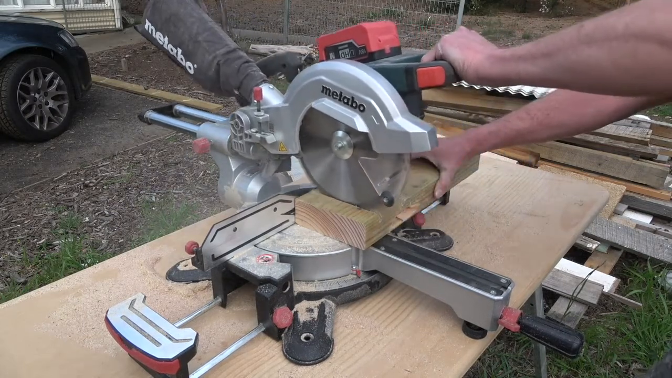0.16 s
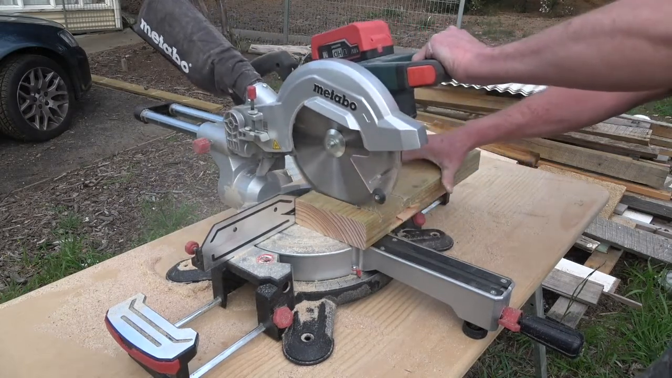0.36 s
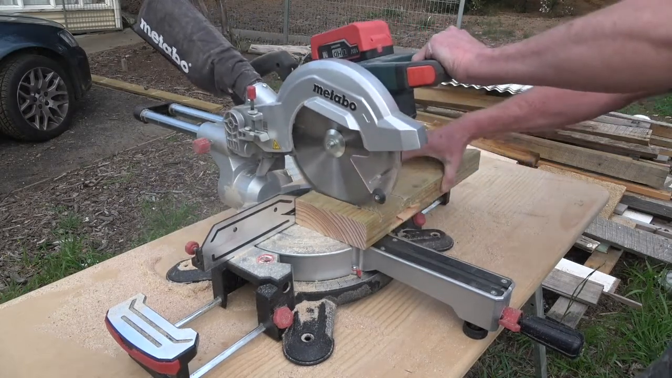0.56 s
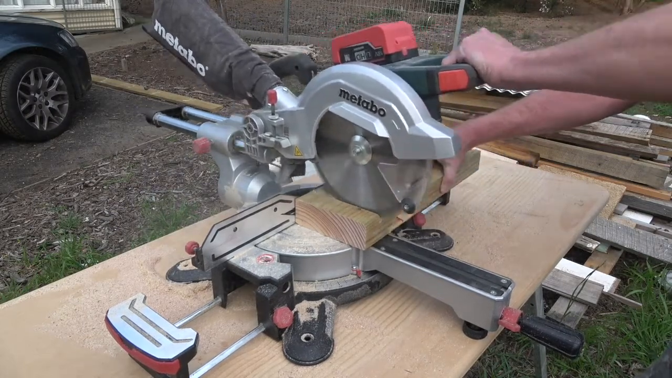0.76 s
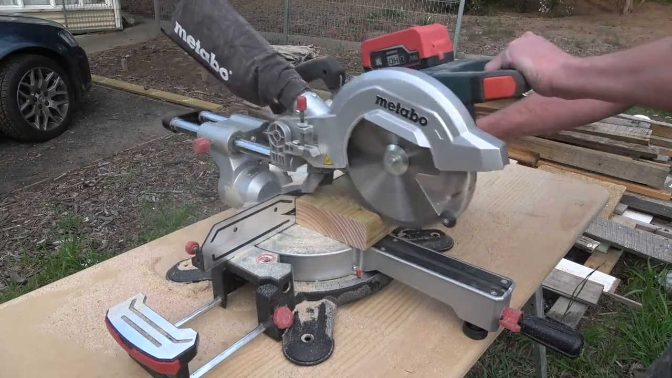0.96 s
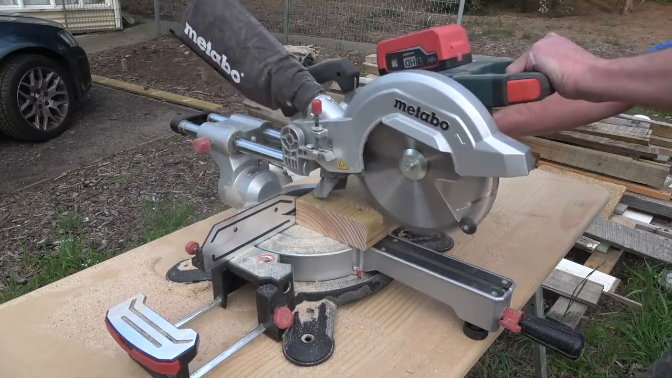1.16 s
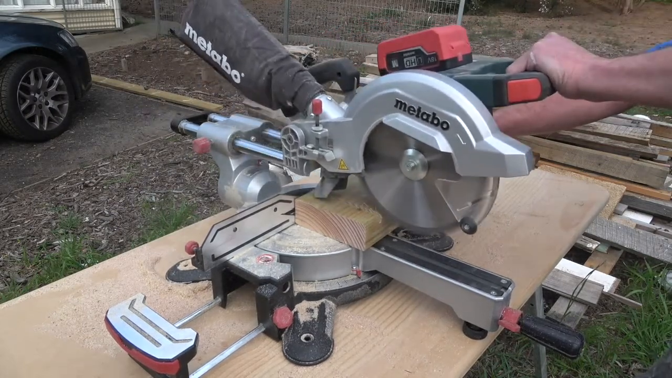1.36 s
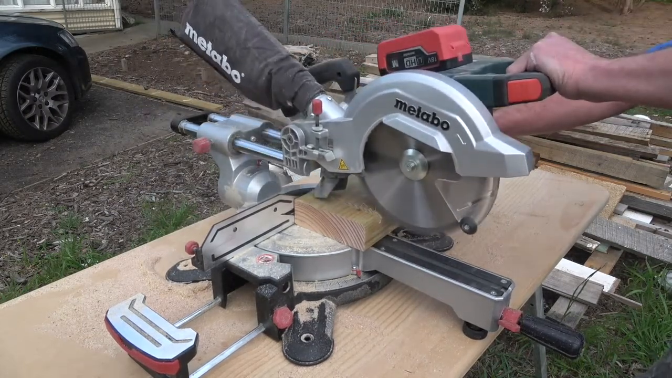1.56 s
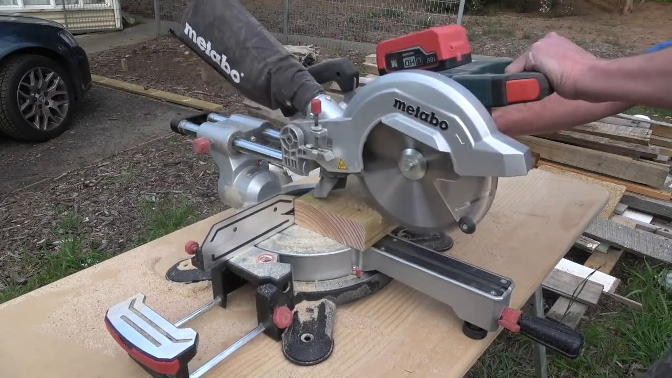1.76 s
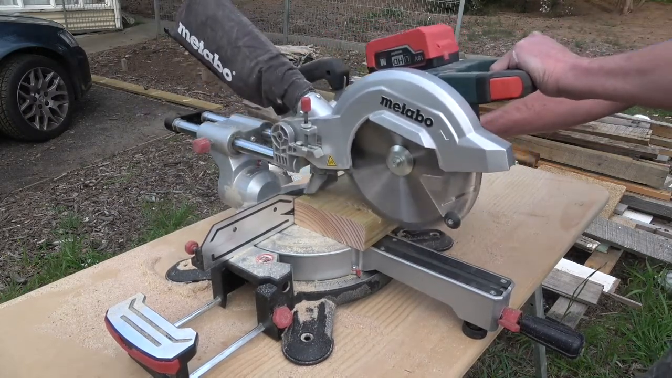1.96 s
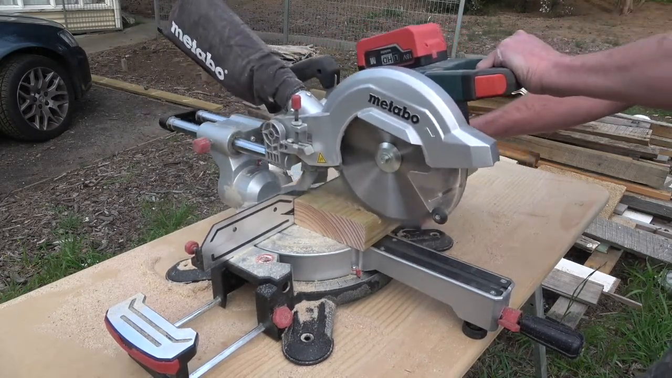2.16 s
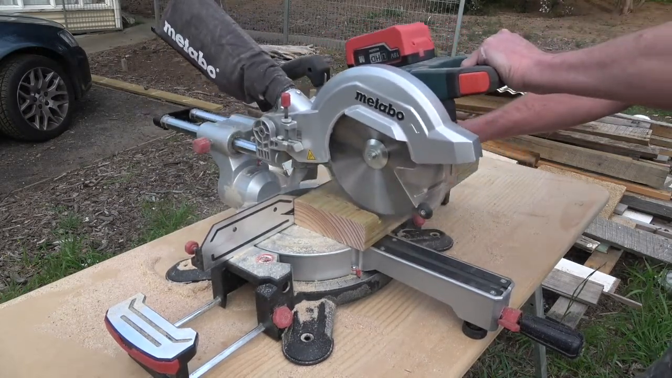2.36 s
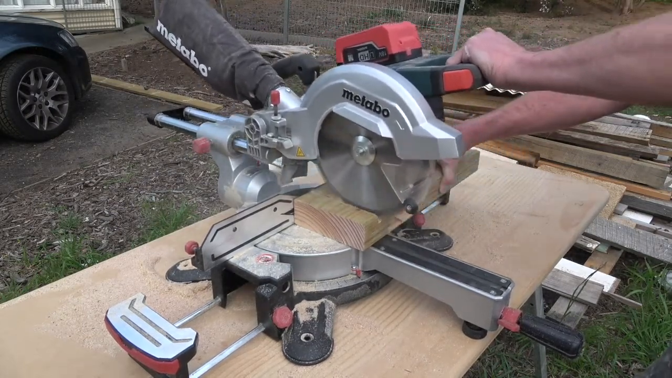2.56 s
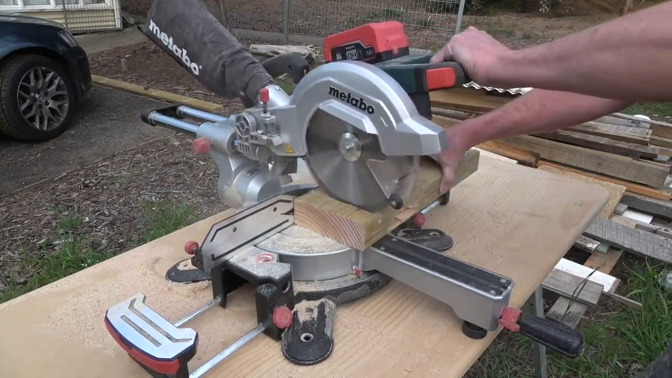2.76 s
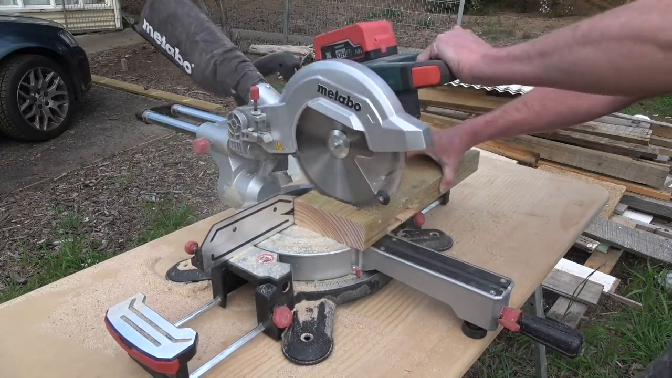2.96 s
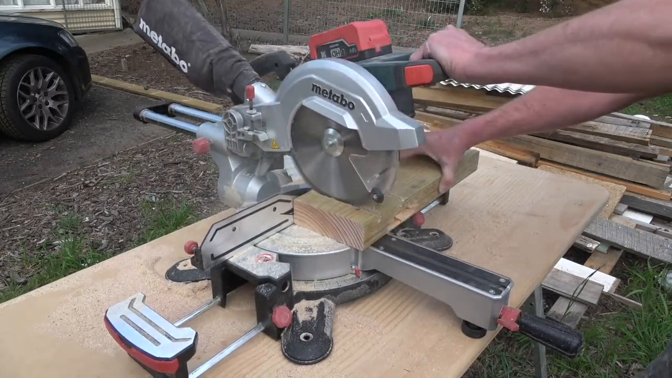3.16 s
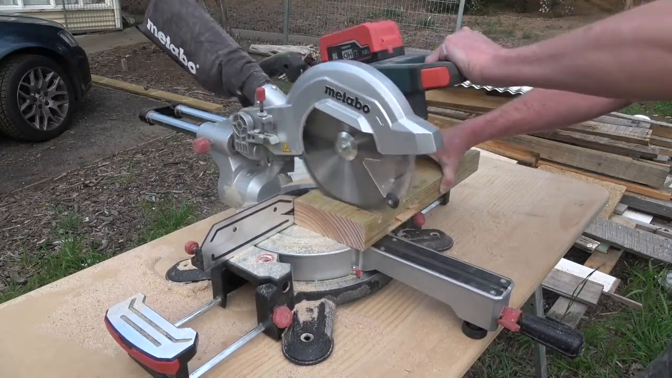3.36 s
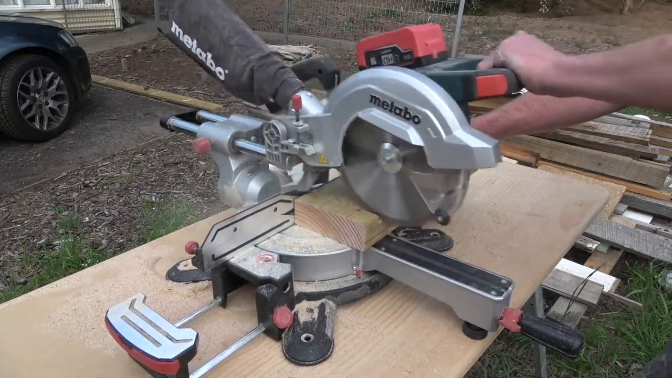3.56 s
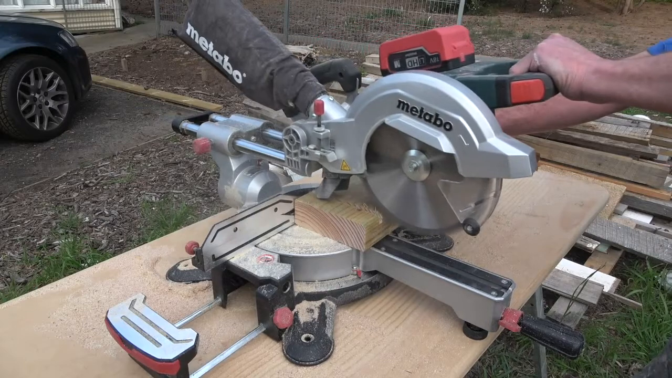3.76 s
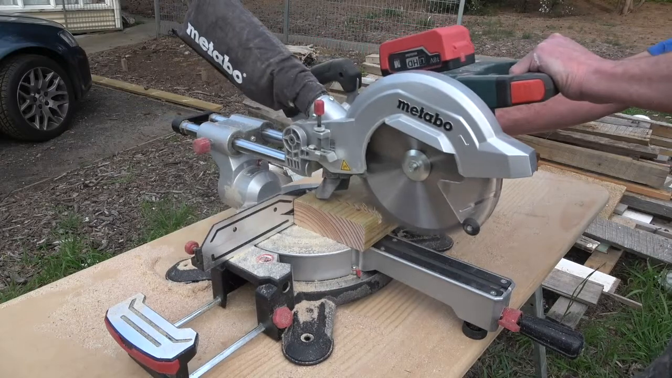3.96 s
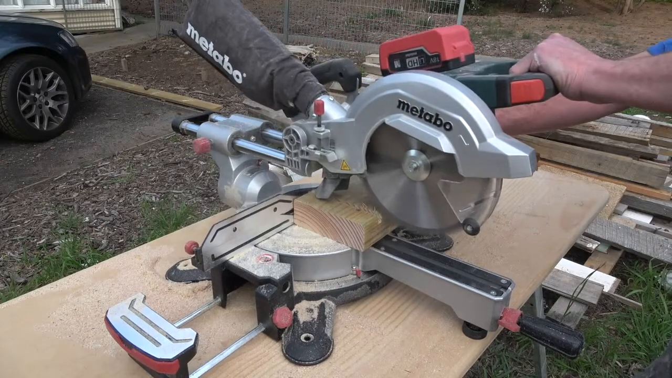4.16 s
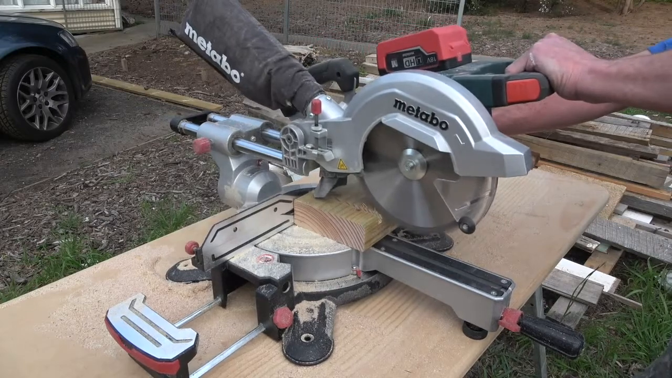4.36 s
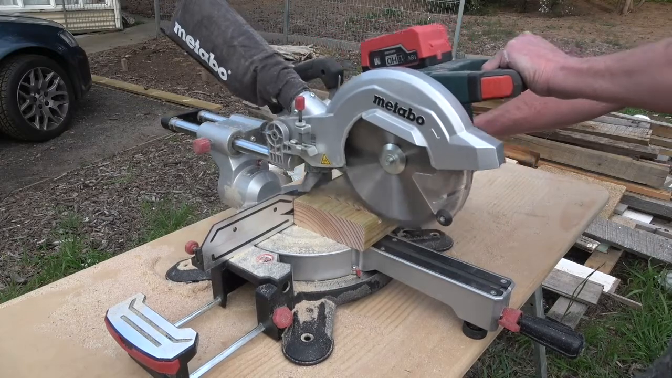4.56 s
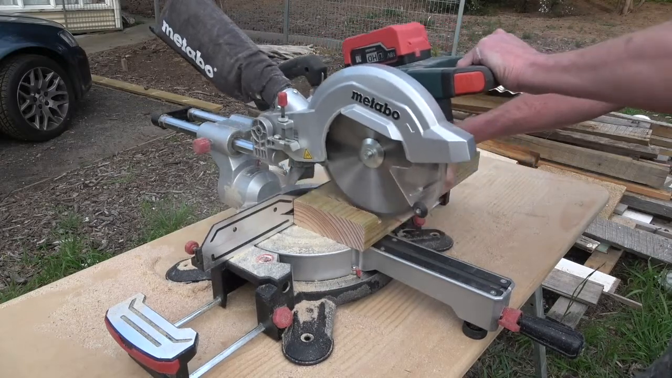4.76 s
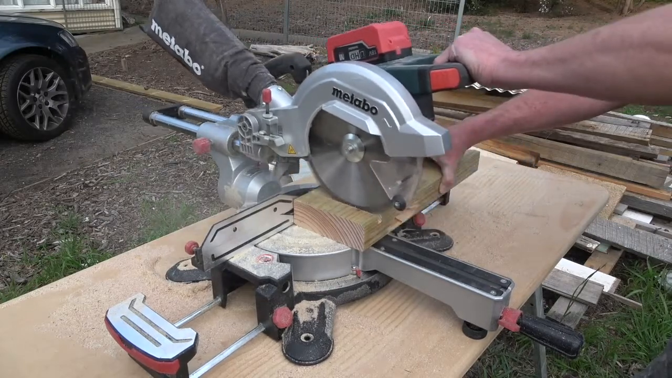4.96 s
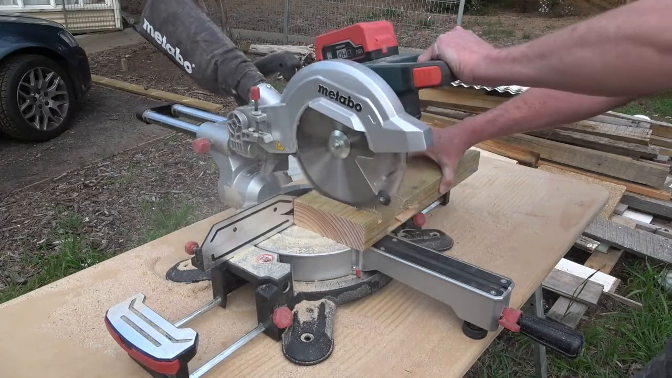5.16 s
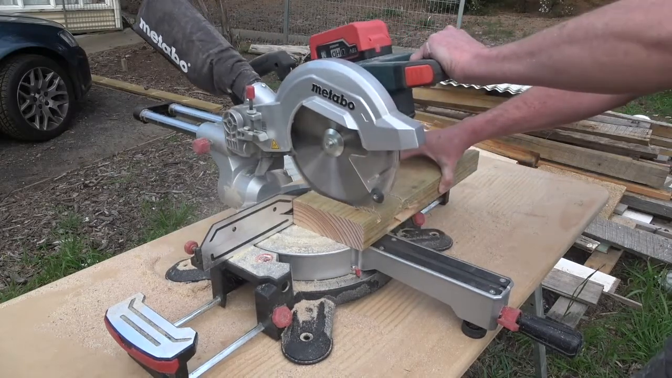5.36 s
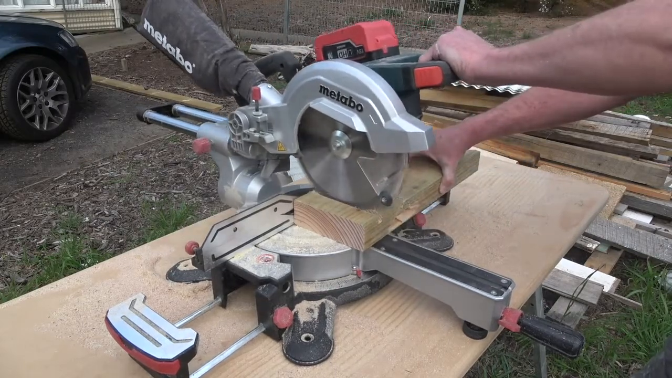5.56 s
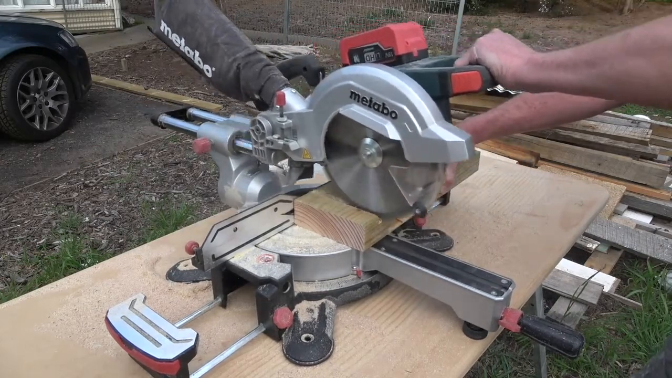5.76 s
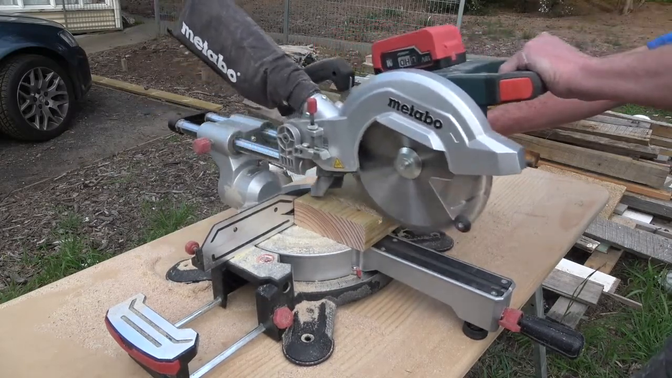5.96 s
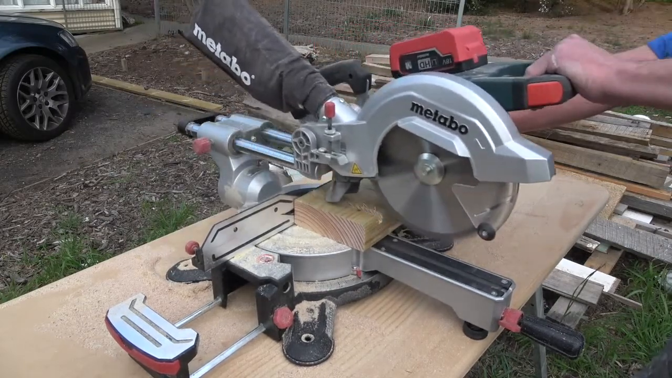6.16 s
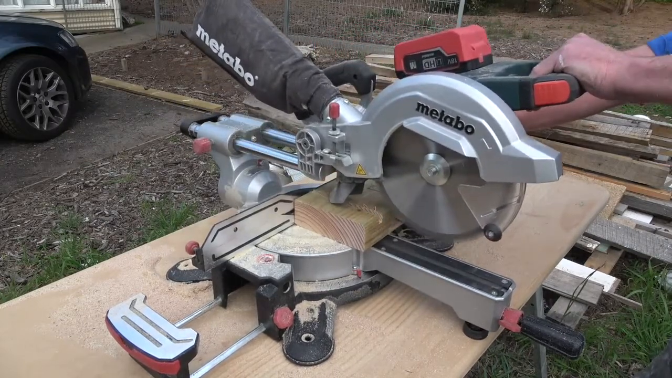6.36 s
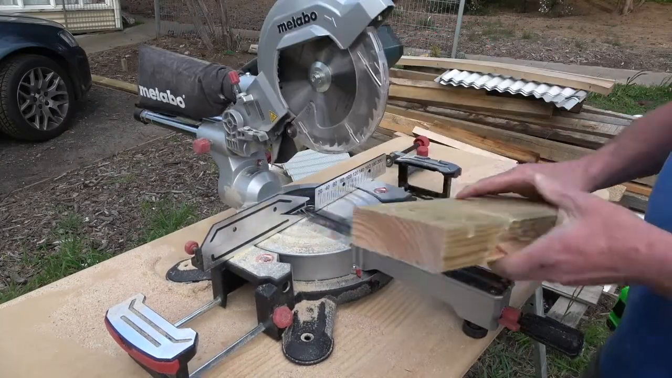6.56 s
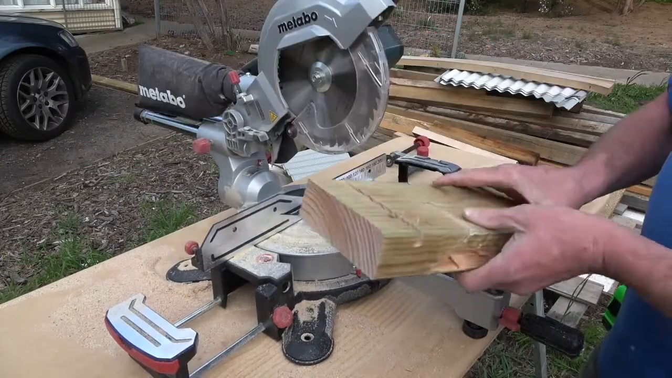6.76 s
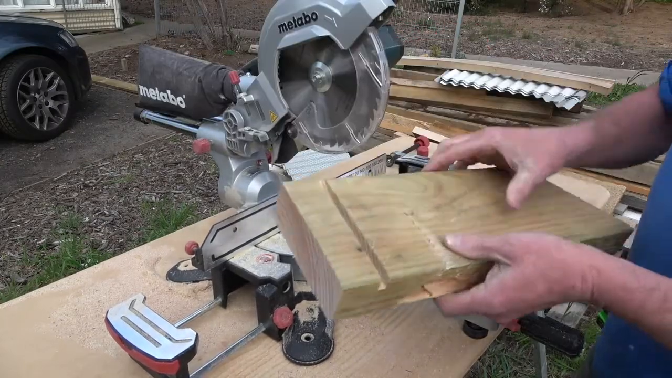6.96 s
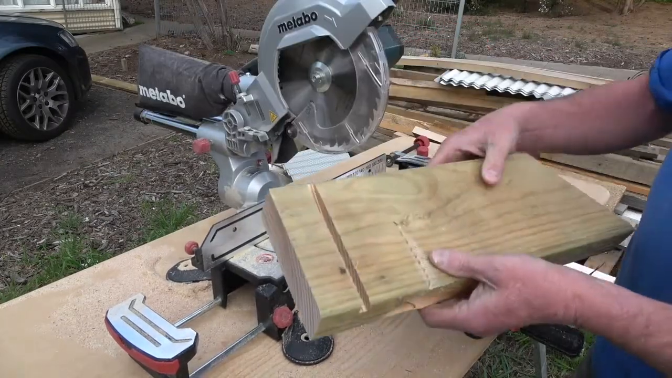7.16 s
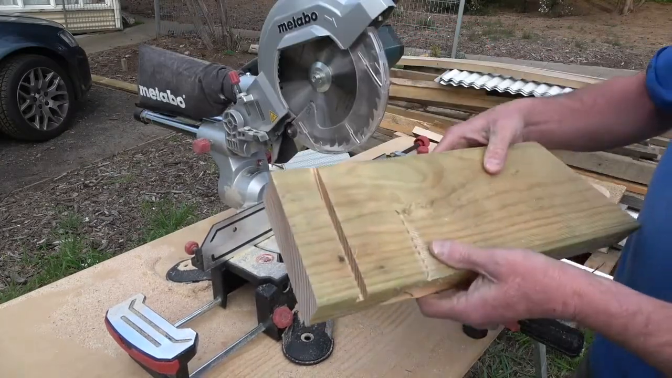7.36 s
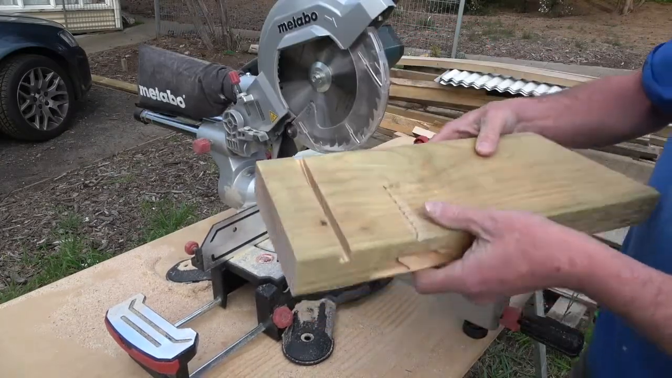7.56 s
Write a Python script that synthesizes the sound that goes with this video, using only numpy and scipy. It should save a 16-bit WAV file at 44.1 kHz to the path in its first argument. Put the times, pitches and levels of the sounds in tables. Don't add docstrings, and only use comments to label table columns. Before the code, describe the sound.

A bright, hissing electric saw fills an open yard, with gear whine, fan roar and metallic blade ringing. Three grooving cuts alternate with free-running whine, each cut pulling the pitch down amid gritty chip noise and small tooth nicks. After the last, the brake drags the tone rapidly lower. A hard cut reveals faint skin rubbing on wood, hollow palm knocks and wind thumping the single microphone.

```python
import sys
import numpy as np
from scipy import signal
from scipy.fft import rfft, irfft, next_fast_len
from scipy.io import wavfile
from scipy.ndimage import uniform_filter1d, map_coordinates

SR = 44100
rng = np.random.default_rng(int(sys.argv[2]) if len(sys.argv) > 2 else 0)


def magnitude_from_level(level_db):
    exponent = np.asarray(level_db, float) / 20
    return 10 ** exponent


def transcribe(u):
    v = np.clip(np.atleast_2d(u).T, -1, 1)
    q = np.round(v * 32767).astype(np.int16)
    wavfile.write(sys.argv[1], SR, q)


N = 335595
T_S = np.arange(N) / SR
SCENE_CHANGE_S = 6.505
TOP_HZ = 15730

# (time [s], peak [dB], rise [dB/s], fall [dB/s])
GUSTS = [(0, -47, 100, 170), (.3, -59, 10, 10), (.63, -47, 300, 25), (1.0, -43, 25, 60),
         (1.3, -41, 20, 120), (2.8, -44, 200, 150), (3.22, -54, 12, 80), (3.98, -41.5, 43, 45),
         (4.79, -41.5, 35, 50), (5.25, -49, 60, 60), (5.8, -56, 20, 50), (6.55, -32, 500, 50),
         (6.93, -41.5, 33, 50), (7.29, -33.5, 45, 100), (7.48, -32.5, 110, 51)]
# (frequency [Hz], level [dB/Hz])
GUST_SPECTRUM = [(7.1, -35), (12, 6), (27, -1), (36, -1), (48, -8), (84, -19.5), (162, -44.5), (200, -54.5),
                 (260, -89), (440, -120)]
CALM_DB, YARD_DB = -68, -63.5
# (frequency [Hz], level [dB/Hz])
YARD_SPECTRUM = [(59, -29), (100, -8), (172, -14.5), (432, -9.5), (1590, -16), (2570, -25), (4150, -25),
                 (7270, -45), (12000, -47), (15600, -72), (22000, -120)]

# (time [s], peak [dB], rise [dB/s], fall [dB/s])
SHUFFLES = [
    (6.533, -51, 1200, 200),
    (7.022, -57, 150, 8.5),
    (7.61, -57.5, 75, 50),
]
# (time [s], length [s], level [dB])
STROKES = [(6.5, .045, -69), (6.563, .095, -66.5), (6.65, .05, -78), (6.698, 0.064, -73), (6.76, .04, -80),
           (6.797, 0.077, -66.5), (6.87, .1, -79), (6.92, .014, -75), (6.968, .11, -68.5), (7.08, .2, -77),
           (7.27, .16, -82), (7.428, 0.096, -71), (7.548, 0.016, -72)]
# (frequency [Hz], level [dB/Hz])
SKIN_SPECTRUM = [(1500, -4), (2500, -3), (3900, -4), (5400, -4.5), (6400, -7), (8000, -15), (12500, -14),
                 (15500, -24)]
# (time [s], length [s], start [Hz], end [Hz], width [Hz], level [dB])
HOLLOWS = [(6.51, 0.083, 300, 200, 150, -57), (6.515, 0.04, 800, 550, 500, -52),
           (6.8, 0.075, 3830, 3810, 200, -65), (7.0, 0.057, 1540, 1500, 90.4, -59),
           (7.02, 0.13, 920, 724, 240, -58), (7.1, .16, 476, 463, 70.4, -61.5),
           (7.08, .14, 3850, 3870, 150, -72), (6.59, .05, 6300, 6250, 300, -73),
           (6.8, .075, 5350, 5300, 400, -73), (6.8, .075, 3350, 3300, 200, -73),
           (7.22, .3, 3950, 4100, 160, -74), (7.08, .08, 5400, 5350, 300, -76),
           (7.44, .07, 5500, 5500, 250, -73), (6.55, .2, 3200, 3150, 200, -73)]

# (time [s], drag [Hz])
DRAG = [(0.0, 35.1), (0.2, 32.5), (0.48, 1.7), (0.92, -1.1), (1.76, 0.5), (1.82, 19.1), (2.22, 59.0),
        (2.7, 77.1), (3.0, 66.7), (3.05, 17.2), (3.21, -0.9), (4.3, 0.5), (4.56, 32.7), (4.73, 38.7),
        (5.16, 26.4), (5.33, -2.1), (5.96, 1.0)]
FREE_HZ, START_HZ, INERTIA_S = 364.5, 321.4, 0.22
BRAKE_S, BRAKE_GRIP_S, BRAKE_HZ_PER_S, BRAKE_HZ_PER_S2 = 5.96, 0.039, 328, 114
TORQUE_HZ = 13
# (time [s], nearness [dB])
NEAR = [(0, -28), (.45, -27.5), (1.1, -25.5), (1.2, -28), (1.75, -28), (2.32, -28.5), (2.42, -28),
        (3.05, -29.5), (3.3, -31), (3.55, -30), (4.35, -29.5), (4.9, -31), (5.2, -32.5), (5.42, -33.5),
        (5.6, -31.5), (5.95, -29), (6.15, -26.5), (6.5, -27.5)]
ROAR_DB_PER_HZ, AIR_DB_PER_HZ, AIR_DB, BURIED_DB = 0.06, 0.078, -3, -2.2
# (start [s], end [s], bite at start [dB], bite at end [dB])
CUTS = [(-.1, .40, -34.5, -35.5), (.40, 0.926, -37, -40), (.93, 1.2, -44, -48.5),
        (1.77, 2.338, -37.5, -35.5), (2.34, 3.079, -38.5, -36), (3.08, 3.475, -39, -41),
        (3.47, 3.622, -44, -44), (3.62, 3.671, -40, -37), (3.666, 3.78, -46.5, -51),
        (4.365, 4.698, -38.5, -37.5), (4.7, 5.27, -40.5, -38), (5.27, 5.46, -40.5, -46.5),
        (5.46, 5.847, -40.5, -39.5), (5.85, 5.952, -42.5, -43.5), (5.98, 6.14, -43.5, -48.5),
        (6.17, 6.4, -47, -51.5)]
IDLE_BITE_DB, ENTER_S = -53.5, 0.016

STRONG_ORDERS = (7, 8, 16, 25)
BLADE_RATIO = 8 / 43
TEETH_PER_TURN = 40 * BLADE_RATIO
TONE_DB, TONE_FOLLOWS = -30, 0.45
# (order [x shaft], centre [Hz], width [Hz], idling [dB], pulling [dB])
FLARES = [(7, 2545, 130, -5.5, -4), (7, 2380, 200, -20, -6), (7, 1900, 900, -25, -17),
          (8, 2380, 300, -19.5, 0), (8, 2660, 260, -18.5, 0), (8, 2860, 160, -12, -5),
          (8, 2050, 250, -20, -7), (16, 5560, 260, -28, 1), (16, 5260, 260, -28, -3),
          (16, 4880, 250, -28, -8), (16, 5750, 120, -27.5, -11), (16, 3900, 900, -28, -9),
          (25, 9110, 110, -8, -13), (25, 8900, 260, -15, -15), (25, 7760, 200, -20.5, -9),
          (25, 6500, 2600, -30, -21), (25, 6290, 300, -20, -13.5), (25, 5540, 260, -21, -11),
          (25, 4900, 300, -20, -14)]
# (time [s], half length [s], change [dB], order [x shaft, 0 = all])
BEAMS = [(6.2, .025, -7, 8), (6.36, .05, -6, 8), (6.22, .04, -7, 25), (6.1, .02, -6, 25),
         (6.12, .025, -7, 16), (6.25, .03, -6, 16), (2.18, .1, 2, 16), (.55, .1, 1.5, 16),
         (3.07, .08, -2, 8), (5.8, .12, -3, 8), (.07, .1, -3.5, 0), (2.85, .25, -1.5, 8), (2.4, .12, 6, 7),
         (4.05, .3, -2, 7), (1.87, .08, -2, 7), (5.15, .2, -1.5, 8), (.35, .12, 2, 0), (2.36, .09, -5, 0),
         (3.2, .1, -2, 0), (3.56, .06, -3, 0), (4.74, .06, -2, 0), (5.64, .2, -10, 0), (.74, .12, -5, 7),
         (1.02, .1, 2, 7), (1.22, .025, -8, 7), (4.55, .08, -4, 7), (5.68, .15, -4, 7), (.72, .14, -5, 8),
         (3.37, .08, -3, 8), (4.77, .06, -10, 16), (4.52, .07, -4, 16), (1.87, .08, -5, 16),
         (2.17, .08, -3, 16), (2.1, .15, 4, 25), (3.07, .07, 3, 25), (5.15, .15, 4, 25)]
BRAKED_DB = (-6, -3, -3, 2)
# (order [x shaft], level [dB])
ORDERS_WEAK = [(3, 3), (6, 1), (9, 2.5), (15, 7), (17, 1.5), (20, 1.5), (22, 5.5), (24, 3), (19, 3),
               (37, 5), (40, 1), (41, 5.5), (42, 7.5)]
# (order [x shaft], level [dB])
ORDERS_BRAKE = [(3, -3), (4, 4), (5, 7), (6, 4), (9, 1), (12, 3), (15, 3), (17, 2), (20, 1), (21, 3),
                (23, 3), (24, 9), (26, 6), (28, 4), (33, 6), (36, 0), (40, 7), (41, 12), (42, 18), (43, 6),
                (50, 9), (51, 14)]
# (centre [Hz], width [Hz], level [dB])
CASING = [(928, 190, -6), (2170, 430, -3), (2680, 390, 0), (3930, 380, -1.5), (5380, 160, 1),
          (6180, 500, -11.5), (7230, 130, -13.5), (7750, 280, -10), (12010, 420, -12), (12930, 240, -8)]
# (frequency [Hz], level [dB/Hz])
AIR_SPECTRUM = [(100, -32.5), (190, -25.5), (260, -24), (400, -19.5), (540, -11), (690, -10), (790, -7),
                (930, -6), (1080, -1.5), (1230, -7), (1380, -16), (1550, -18), (2500, -18)]
# (frequency [Hz], level [dB/Hz])
ROAR_SPECTRUM = [(900, -34), (1500, -8), (2000, -3.5), (2450, -4), (2830, -8), (3100, -2.5), (4700, -1),
                 (5600, -2), (6600, -14.5), (8600, -19), (9400, -17.5), (10300, -25), (12400, -15.5),
                 (13500, -25), (15700, -32.5)]
# (frequency [Hz], level [dB/Hz])
RASP_SPECTRUM = [(4900, -25), (5400, 3), (5800, -21), (10500, -20), (11700, -1), (12900, 2), (13500, -13.5),
                 (15700, -28.5)]

# (centre [Hz], width [Hz], level [dB])
BLADE_MODES = [(2562, 33, -5.5), (3050, 40, -10), (3260, 49, -11.5), (3760, 37, -7.5), (4400, 45, -12),
               (5020, 50, -4.5), (5253, 77, -4.5), (6100, 44, -7.5), (6490, 25, -5.5), (6520, 36, -12.5),
               (6720, 64, -10.5), (7110, 30, -8), (7740, 32, -11.5), (8100, 60, -7.5), (8950, 50, -11),
               (9490, 52, -10), (10240, 45, -20), (10500, 50, -11.5), (11700, 61, -11), (12200, 50, -15),
               (12940, 60, -9), (13200, 50, -14), (13800, 40, -15), (14300, 50, -12), (15250, 60, -14)]
PLATE_HZ, PLATE_WIDTH_HZ, PLATE_SHIFT = 2590, 130, 1.012
# (time [s], peak [dB])
NICKS = [(0.098, -15), (2.847, -19), (0.5761, -13), (0.7826, -15), (0.9053, -19), (1.7769, -16),
         (3.5334, -19), (3.6092, -24), (3.6396, -23.5), (4.3789, -16), (5.3173, -33), (5.4555, -21),
         (5.5114, -23.5), (5.5827, -25), (5.883, -19.5)]
# (frequency [Hz], level [dB/Hz])
CHIP_SPECTRUM = [(1200, -36.5), (2500, -15), (5200, -4.5), (6400, -9), (9200, -5.5), (10900, -11.5),
                 (12800, -10), (15700, -12)]
# (frequency [Hz], level [dB/Hz])
BENCH_SPECTRUM = [(100, -45), (190, -19), (300, -13), (520, 0), (700, -6), (1100, -25)]
# (time [s], length [s], start
# [Hz], end [Hz], width [Hz], level [dB])
SINGING = [(.02, 0.22, 7140, 7140, 15, -36.5), (0, 0.25, 5220, 5225, 25, -38),
           (2.6, .45, 7130, 7100, 12, -39.5), (2.65, 0.42, 5220, 5310, 8, -44),
           (2.84, .17, 6380, 6360, 9.4, -39), (4.88, .18, 3725, 3730, 14, -41),
           (5.07, .33, 3735, 3745, 6, -38.5), (4.9, .25, 6245, 6170, 11, -42),
           (4.9, .3, 8140, 8250, 29, -46.5), (4.55, .6, 7160, 7150, 29, -49.5),
           (2.1, 1.1, 246, 228, 8, -65), (6.0, .6, 5450, 5450, 220, -49), (2.0, .48, 3070, 3070, 45, -44),
           (2.62, .43, 2205, 2185, 5, -44), (.3, .7, 185, 190, 12, -64), (0, .2, 6540, 6540, 25, -44),
           (4.87, .2, 4600, 4600, 20, -45), (4.55, .15, 5240, 5130, 15, -40)]


def unit(x):
    return x / np.sqrt(np.mean(x ** 2) + 1e-20)


def along(points, hz):
    f, db = np.transpose(points)
    return np.interp(np.log(hz + 1), np.log(f + 1), db, left=-120, right=-120)


def curves(rows):
    s, *cols = np.transpose(rows)
    return [np.interp(T_S, s, c) for c in cols]


def wobble(rate_hz):
    knots = rng.standard_normal(int(N * rate_hz / SR) + 4)
    return map_coordinates(knots, [np.arange(N) * rate_hz / SR])


def filtered(x, response):
    m = next_fast_len(N + SR // 2)
    return irfft(rfft(x, m) * response(np.fft.rfftfreq(m, 1 / SR)), m)[:N]


def coloured(x, spectrum):
    return filtered(x, lambda hz: magnitude_from_level(along(spectrum, hz)))


def level(x, lo_hz, hi_hz):
    return x / np.std(filtered(x, lambda f: (f > lo_hz) & (f < hi_hz)))


def patchy(patchy_db, size):
    z = signal.stft(rng.standard_normal(N), nperseg=512)[2]
    field = uniform_filter1d(rng.standard_normal(z.shape), size=5, axis=0)
    field = uniform_filter1d(field, size=size, axis=1)
    return signal.istft(z * magnitude_from_level(patchy_db * unit(field)), nperseg=512)[1][:N]


def resonant(x, modes):
    def response(f):
        return sum((-1) ** k * magnitude_from_level(db) * 1j * f * w / (c * c - f * f + 1j * f * w)
                   for k, (c, w, db) in enumerate(modes))
    return filtered(x, response)


def swells(rows, steady):
    sound = np.zeros(N)
    for s, length, from_hz, to_hz, width_hz, db in rows:
        span = slice(round(s * SR), round((s + length) * SR))
        u = np.linspace(0, 1, span.stop - span.start)
        phase = 2 * np.pi * np.cumsum(from_hz + (to_hz - from_hz) * u) / SR
        breathy = (steady + wobble(width_hz)[span]) * np.sin(phase)
        breathy += wobble(width_hz)[span] * np.cos(phase)
        sound[span] += magnitude_from_level(db) * np.sqrt(np.abs(np.sin(np.pi * u))) * breathy
    return sound


def peaks(rows, rest_db):
    hills = [db - np.where(T_S < s, rise * (s - T_S), fall * (T_S - s)) for s, db, rise, fall in rows]
    return np.max(hills + [np.full(N, rest_db)], axis=0)


def wind():
    gust_db = peaks(GUSTS, CALM_DB) + 1.1 * wobble(18)
    return magnitude_from_level(gust_db) * unit(coloured(rng.standard_normal(N), GUST_SPECTRUM))


def hands():
    yard = level(coloured(patchy(2.5, size=10), YARD_SPECTRUM), 300, 1800)
    yard *= magnitude_from_level(peaks(SHUFFLES, YARD_DB) - 2.5)
    edge_s = 0.0093
    strokes = sum(magnitude_from_level(db) * np.clip(np.minimum(T_S - s, s + length - T_S) / edge_s, 0, 1)
                  for s, length, db in STROKES)
    skin = strokes * magnitude_from_level(1.3 * wobble(40)) * unit(coloured(patchy(2.4, size=6), SKIN_SPECTRUM))
    return (yard + skin + swells(HOLLOWS, steady=0)) * (T_S > SCENE_CHANGE_S)


def shaft():
    keep = np.exp(-1 / (INERTIA_S * SR))
    hz = signal.lfilter([1 - keep], [1, -keep], FREE_HZ - curves(DRAG)[0], zi=[START_HZ])[0]
    u = np.clip(T_S - BRAKE_S, 0, 1)
    gripped_s = u - BRAKE_GRIP_S * (1 - np.exp(-u / BRAKE_GRIP_S))
    return hz - BRAKE_HZ_PER_S * gripped_s - BRAKE_HZ_PER_S2 * u * u


def biting():
    bite_db = np.full(N, float(IDLE_BITE_DB))
    for start, end, from_db, to_db in CUTS:
        inside = (T_S >= start) & (T_S < end)
        bite_db[inside] = np.interp(T_S[inside], [start, end], [from_db, to_db])
    return uniform_filter1d(bite_db, round(ENTER_S * SR), mode="nearest")


def flaring(hz, pull, near_db):
    common_db = TONE_DB + TONE_FOLLOWS * (near_db - TONE_DB)
    braked = T_S > BRAKE_S
    levels_db = []
    for k, braked_db in zip(STRONG_ORDERS, BRAKED_DB):
        power = sum(magnitude_from_level(idle_db + (pull_db - idle_db) * pull) ** 2 / (1 + (2 * (k * hz - c_hz) / width_hz) ** 4)
                    for order, c_hz, width_hz, idle_db, pull_db in FLARES if order == k)
        beam_db = sum(db * np.exp(-((T_S - s) / half_s) ** 2)
                      for s, half_s, db, order in BEAMS if order in (0, k))
        flutter_db = 0.9 * wobble(9) + 0.8 * wobble(70)
        levels_db.append(common_db + beam_db + 10 * np.log10(power) + braked_db * braked + flutter_db)
    return levels_db


def tone(turns, order, flutter_db):
    phase = 2 * np.pi * (order * turns + rng.random())
    return magnitude_from_level(flutter_db * wobble(30)) * np.sqrt(2) * np.sin(phase)


def comb(turns, orders):
    strength = np.zeros(513)
    strength[2:53] = 1
    for k, db in orders:
        strength[k] = magnitude_from_level(db)
    strength[list(STRONG_ORDERS)] = 0
    one_turn = irfft(strength * np.exp(2j * np.pi * rng.random(513))) * 1024 / np.sqrt(2)
    return map_coordinates(one_turn, [turns % 1 * 1024], mode="grid-wrap")


def mixed_comb(turns, orders, depth, rate_hz):
    return comb(turns, orders) + depth * wobble(rate_hz) * comb(turns, orders)


def mesh_sides(hz, turns, tones_db, bite_db):
    slot_db, mesh_db = tones_db[:2]
    sound = np.zeros(N)
    for order, side_db, met_db in ((8 - BLADE_RATIO, mesh_db - 19, 0), (8 + BLADE_RATIO, mesh_db - 19, 1.5),
                                   (7 + BLADE_RATIO, slot_db - 12, -2.5)):
        met = magnitude_from_level(bite_db + met_db) / (1 + (2 * (order * hz - PLATE_HZ) / PLATE_WIDTH_HZ) ** 4)
        sound += (magnitude_from_level(side_db) + met) * tone(turns, order, flutter_db=2.5)
    return sound


def unbalance(hz, turns, load, brake):
    shake = 1 / (1 + ((hz - 346) / 13) ** 4) + 0.13 * load + 0.3 * brake * (hz / FREE_HZ) ** 2
    sound = magnitude_from_level(-52) * shake * tone(turns, order=1, flutter_db=1.5)
    third = magnitude_from_level(-51 - 3 * brake) / (1 + ((3 * hz - 920) / 60) ** 2)
    return sound + third * tone(turns, order=3, flutter_db=2.5)


def casing(turns, roar_db, bite_db, load, brake):
    orders = mixed_comb(turns, ORDERS_WEAK, 0.74, 14)
    free = resonant(magnitude_from_level(roar_db - 17) * (1 - brake) * orders, CASING)
    strained = resonant(magnitude_from_level(bite_db - 3) * load * orders, CASING)
    braking_db = -46.5 + 0.94 * (roar_db + 31.5) + 1.5 * wobble(25)
    braking = resonant(magnitude_from_level(braking_db) * brake * mixed_comb(turns, ORDERS_BRAKE, 0.7, 25), CASING)
    sound = filtered(free, lambda f: 1 / (1 + (f / 7000) ** 2))
    sound += filtered(strained, lambda f: 1 / (1 + (5000 / (f + 1)) ** 4))
    return sound + filtered(braking, lambda f: 1 - 0.8 / (1 + ((f - 9300) / 1300) ** 4))


def motor_noise(turns, air_db, roar_db, brake):
    air = level(coloured(patchy(1.5, size=8), AIR_SPECTRUM), 500, 1400)
    gate = 1 + 0.09 * np.cos(2 * np.pi * turns) + 0.07 * np.cos(2 * np.pi * turns * BLADE_RATIO)
    roar = level(coloured(gate * patchy(1.2, size=10), ROAR_SPECTRUM), 3000, 4600)
    rasp = brake * unit(coloured(patchy(2.7, size=6), RASP_SPECTRUM))
    sound = magnitude_from_level(air_db - 0.5) * air + magnitude_from_level(roar_db - 1.5 - 4 * brake) * roar
    return sound + magnitude_from_level(-43.5 + 0.35 * (roar_db + 38.5)) * rasp


def motor(hz, turns, tones_db, air_db, roar_db, bite_db):
    brake = np.clip((T_S - 5.97) / 0.039, 0, 1)
    load = np.clip((363 - hz) / 18, 0, 1) * (1 - brake)
    sound = sum(magnitude_from_level(db) * tone(turns, k, flutter_db=1.5) for k, db in zip(STRONG_ORDERS, tones_db))
    sound += mesh_sides(hz, turns, tones_db, bite_db) + unbalance(hz, turns, load, brake)
    sound += casing(turns, roar_db, bite_db, load, brake)
    return sound + motor_noise(turns, air_db, roar_db, brake)


def plate_ring(teeth, bite):
    uneven = map_coordinates(rng.standard_normal(512), [teeth / 40 % 1 * 512], mode="grid-wrap")
    push = bite * (patchy(5, size=16) + 0.86 * uneven * magnitude_from_level(2.5 * wobble(4.4)))
    grip = np.pi / 4 * (1 + np.tanh(1.5 * wobble(5)))
    gripped = [(c * PLATE_SHIFT, w, db) for c, w, db in BLADE_MODES]
    ring = resonant(push * np.cos(grip), BLADE_MODES) + resonant(push * np.sin(grip), gripped)
    return magnitude_from_level(11.8) * unit(ring) * np.std(bite)


def groove_nicks():
    t = np.arange(SR // 10) / SR
    nicks = np.zeros(N)
    decay_s = 0.056
    for s, db in NICKS:
        nicks[round(s * SR):][:len(t)] += magnitude_from_level(db - 1.5 - 60 * t / decay_s) * rng.standard_normal(len(t))
    return magnitude_from_level(1.5) * coloured(nicks, CHIP_SPECTRUM) + magnitude_from_level(14) * resonant(nicks, BLADE_MODES)


def blade(turns, roar_db, bite_db):
    teeth = TEETH_PER_TURN * turns
    whistle = magnitude_from_level(roar_db - 12.5 - 6 * (T_S > BRAKE_S)) * tone(teeth, order=1, flutter_db=1)
    gate = magnitude_from_level(4.1 * (bite_db + 48.5))
    bite = magnitude_from_level(bite_db) * gate / (1 + gate)
    overtones = sum(magnitude_from_level(db) * tone(teeth, k, flutter_db=3) for k, db in ((2, -6), (4, -12), (5, -12)))
    grit = magnitude_from_level(3 * wobble(900) + 1.5 * wobble(60) + 0.6 * np.cos(2 * np.pi * teeth / 40))
    chips = level(coloured(grit * patchy(2, size=8), CHIP_SPECTRUM), 9600, 11400)
    bench = unit(coloured(patchy(2, size=10), BENCH_SPECTRUM))
    cut = bite * (magnitude_from_level(-11) * bench + magnitude_from_level(-4.5) * chips + overtones)
    return whistle + cut + plate_ring(teeth, bite) + groove_nicks() + swells(SINGING, steady=1.6)


def saw():
    hz, near_db, bite_db = shaft(), curves(NEAR)[0], biting()
    slowed_hz = np.clip(FREE_HZ - hz, 0, None)
    buried = np.clip((bite_db + 47.5) / 6, 0, 1)
    pull = 1 - (1 - 0.7 * buried) * np.exp(-slowed_hz / TORQUE_HZ)
    tones_db = flaring(hz, pull, near_db)
    roar_db = near_db - ROAR_DB_PER_HZ * slowed_hz + 0.5 * wobble(9)
    air_db = near_db + AIR_DB - AIR_DB_PER_HZ * slowed_hz + BURIED_DB * buried + 0.5 * wobble(10)
    turns = np.cumsum(hz * (1 + 0.0006 * wobble(40))) / SR
    sound = motor(hz, turns, tones_db, air_db, roar_db, bite_db) + blade(turns, roar_db, bite_db)
    return sound * np.clip((SCENE_CHANGE_S - T_S) / 0.001, 0, 1)


def scene():
    return np.tile(wind() + hands() + saw(), (2, 1))


def top_cut(x):
    return signal.sosfilt(signal.butter(12, 16870, fs=SR, output="sos"), x)


def record(dry):
    mix = np.array([filtered(c, lambda f: f < TOP_HZ) for c in dry])
    return top_cut(mix)


dry = scene()
out = record(dry)
transcribe(out)
```